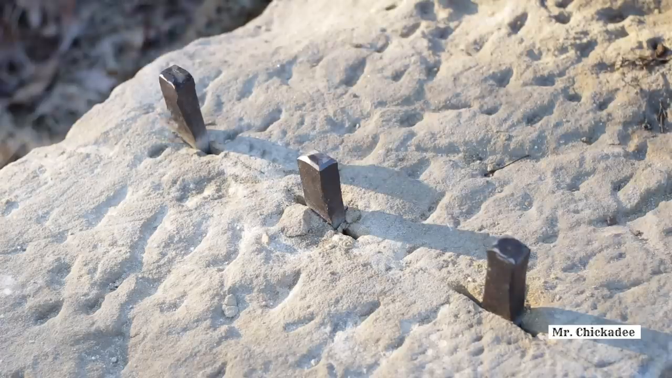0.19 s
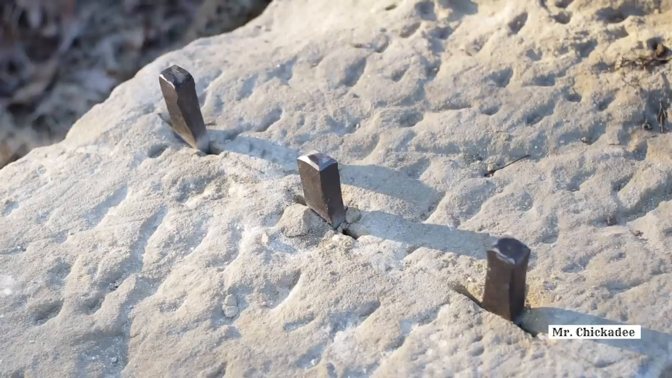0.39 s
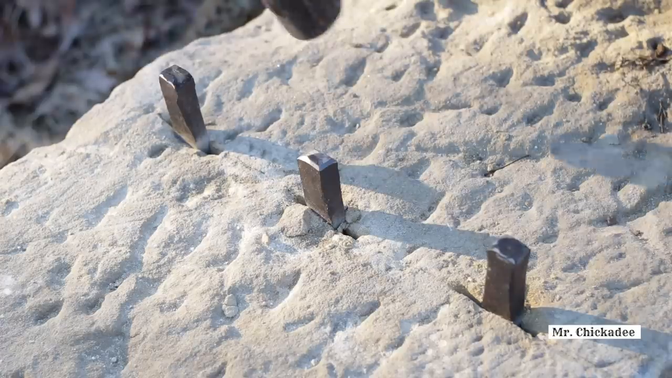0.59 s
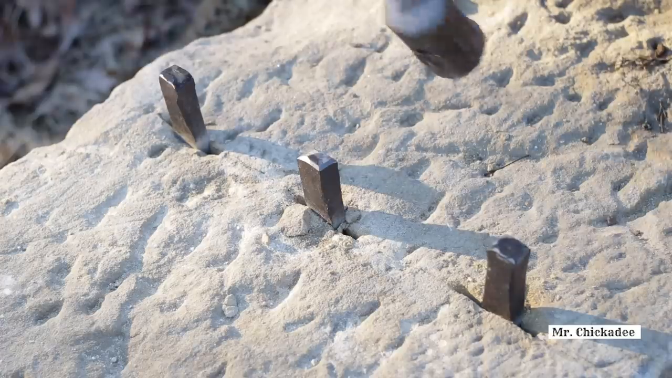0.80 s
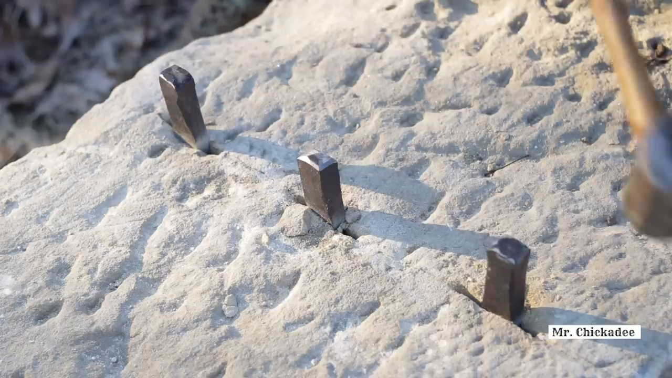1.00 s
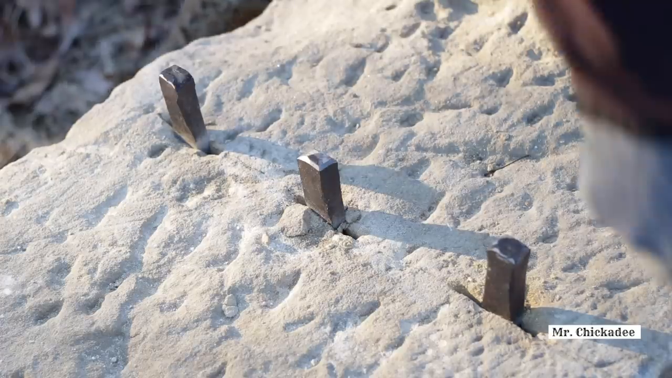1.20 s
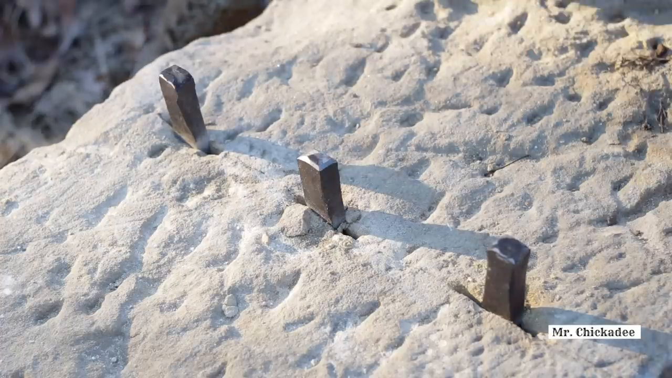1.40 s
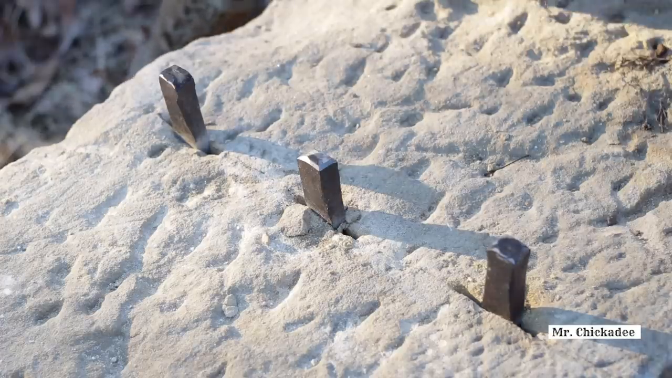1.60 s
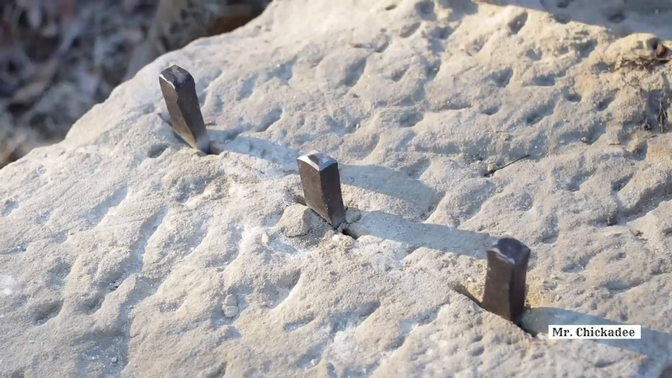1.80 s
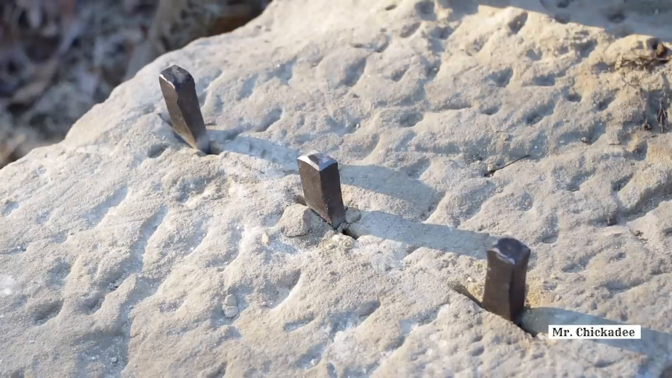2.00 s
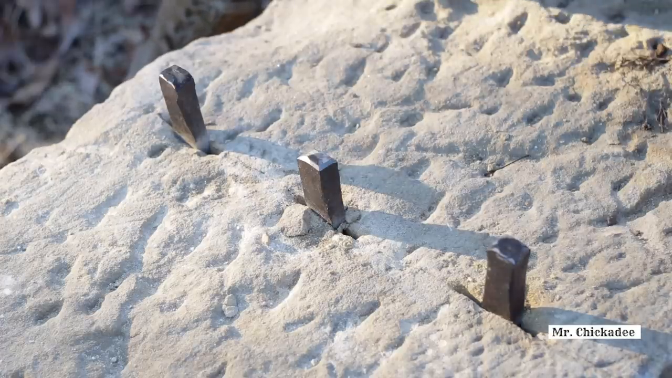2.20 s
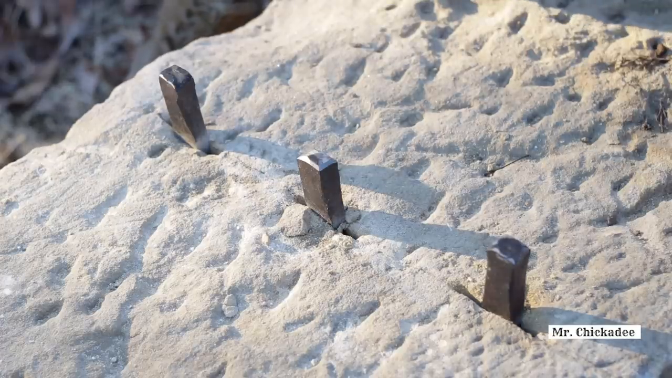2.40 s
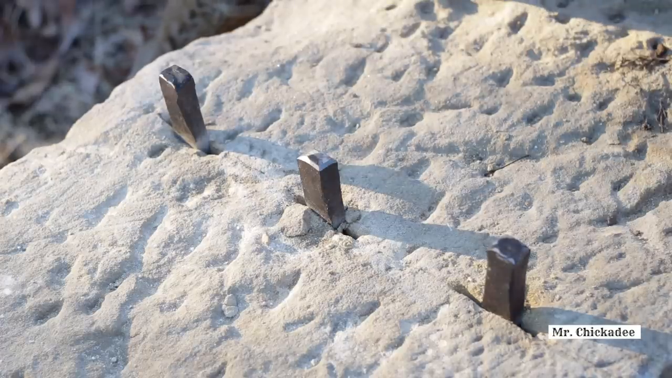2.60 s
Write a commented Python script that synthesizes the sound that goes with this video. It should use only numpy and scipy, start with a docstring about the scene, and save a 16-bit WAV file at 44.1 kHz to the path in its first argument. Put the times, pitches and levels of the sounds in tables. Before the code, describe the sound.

Hammer blows on steel wedges set in a stone block, sharp and short, with faint outdoor echo

```python
"""Hammer on steel wedges, outdoors

A hand hammer works on wedges in a stone block, close to a small stereo camera: two hard blows on two wedges and,
between them, a duller double tap. Each blow sums damped modes with noise for cracking, crumbling and the block.
Trees around return a swelling noise echo; clothes and grit rustle as grainy noise, over ticks and a bed of air.
The camera limits the hardest peaks and turns its gain down for a moment."""
import sys
import numpy as np
from scipy import signal
from scipy.fft import rfft, irfft, next_fast_len
from scipy.io import wavfile

SR = 44100
rng = np.random.default_rng(int(sys.argv[2]) if len(sys.argv) > 2 else 0)


def log_audio(samples):
    """Write samples as a 16-bit WAV file to the path given in sys.argv[1]."""
    # one column per channel
    frames = np.atleast_2d(samples).T
    # limit to full scale, then quantise
    limited = np.clip(frames, -1, 1)
    pcm = np.round(limited * 32767).astype(np.int16)
    wavfile.write(sys.argv[1], SR, pcm)


N = 114660  # samples

# Hammer blows close to the microphones; columns: t/s, level/dB, left over right/dB, left lag/ms, struck thing (0-2),
# contact/ms, crack/dB and crumble/dB (both relative to the blow), wall slap/dB, hammer ring/dB, tree echo/dB
BLOWS = [(0.2005, -8, 4.5, 0.0042, 0, 0.96, -1.5, -7.5, -39, -57, -51.5),
         (1.5362, -15, -1.5, 0.068, 1, 2.5, 1.5, -13.5, -37.5, -78, -54.5),
         (1.6525, -15, -1, 0.062, 1, 1.9, -7, -13, -37.5, -78, -59.5),
         (2.3234, -8, -2, 0.056, 2, 2.1, -1.5, -5.5, -44.5, -57, -55.5)]
# Modes of the first wedge; columns: f/Hz, level/dB, t60/s
FIRST_WEDGE_MODES = [(185, -10.5, .06), (215, -9, .06), (300, -21, 0.09), (528, -23.5, 0.053),
                     (983, -5.5, 0.02), (1211, 7.5, 0.011), (1392, 1, .015), (2188, -3.5, 0.013),
                     (3606, -8.5, 0.0082), (3960, -12.5, 0.009), (2810, -11, 0.013), (5070, -4, 0.0036),
                     (5770, -13, .006), (6310, -6.5, 0.0041), (8790, -10, 0.0029), (11050, -16.5, 0.023),
                     (15430, -41, 0.0027)]
# Modes heard in the dull double tap; columns: f/Hz, level/dB, t60/s
STONE_TAP_MODES = [(280.7, -12.5, 0.074), (535, -23.5, 0.059), (810, -14.5, 0.049), (1108, -3, 0.018),
                   (1390, 2, 0.0062), (1747, -2, .012), (1872, -7, 0.016), (2895, -4, .012),
                   (3800, -12, .01), (4436, -12.5, .01), (4950, -10, .01), (6800, -21, 0.0074),
                   (8030, -26, .008), (10900, -48.5, .005)]
# Modes of the second wedge; columns: f/Hz, level/dB, t60/s
SECOND_WEDGE_MODES = [(122, -20.5, 0.052), (265.8, -8.5, 0.051), (562, -17, 0.048), (706, -9.5, 0.032),
                      (1069, -2, 0.031), (2376, -11.5, .01), (2595, -1.5, .01), (3170, -5, .01),
                      (3470, -3.5, .01), (4950, -6, .01), (5600, 0.5, 0.0059), (6020, 4.5, 0.0059),
                      (6470, -1.5, .009), (7580, 0.5, 0.0039), (9320, -16.5, 0.01), (13800, -41, .005)]


def hammer():
    """Each blow rings, cracks and crumbles; the slab face repeats it, the hammer head rings, a wall slaps back."""
    ring_hz, ring_t60 = 12700, 0.2
    slab_delay_s, slab_db = 0.0021, -17
    wall_delay_s = 0.026
    low_cut_hz = 117
    mix, t = np.zeros((2, N)), np.arange(SR // 4) / SR
    for s, db, pan_db, lag_ms, thing, contact_ms, crack_db, crumble_db, slap_db, ring_db, _ in BLOWS:
        modes = np.array([FIRST_WEDGE_MODES, STONE_TAP_MODES, SECOND_WEDGE_MODES][round(thing)])
        late = np.clip(t - np.array([[lag_ms], [0]]) / 1000, 0, None)  # seconds since arrival, left and right
        noise = rng.standard_normal((4, len(t)))
        body = struck_modes(modes, late, contact_ms / 1000)
        body = body + breaking_stone(modes, noise, t, crack_db, crumble_db)
        body = body + stone_block(noise, t)
        pan = np.array([[pan_db], [-pan_db]]) / 2
        body = amp(db + pan) * body * (late > 0)
        ring = amp(ring_db - 60 * t / ring_t60) * np.sin(2 * np.pi * ring_hz * late)
        add(mix, s, body + ring)
        add(mix, s + slab_delay_s, amp(slab_db) * body)
        add(mix, s + wall_delay_s, amp(slap_db) * wall_slap(noise, t))
    return filtered(mix, lambda hz: (1j * hz / (1j * hz + low_cut_hz)) ** 2)


def struck_modes(modes, late, contact_s):
    """Modes build up at the strike, hold while contact lasts, then decay; the stone's grip damps the treble."""
    treble_from_hz, treble_t60 = 2000, 0.009  # longest t60 allowed above this pitch
    rise_cycles, scatter_db = 0.3, 1.5
    free = np.clip(late - contact_s, 0, None)
    body = 0
    for hz, mode_db, t60 in modes:
        if hz > treble_from_hz:
            t60 = min(t60, treble_t60)
        decay = amp(mode_db + rng.normal(0, scatter_db) - 60 * free / t60)
        rise = 1 - np.exp(-late * hz / rise_cycles)
        body = body + decay * rise * np.sin(2 * np.pi * hz * late)
    return body


def breaking_stone(modes, noise, t, crack_db, crumble_db):
    """Decaying noise coloured by the modes: a central crack and a wider, longer crumble of stone."""
    crack_t60, crumble_t60, tilt_db = 0.015, 0.03, -0.5  # tilt per octave

    def crumble_colour(hz):
        tilt = tilt_db * np.log2(hz / 1000 + 0.1)
        return amp(along(modes, hz) + tilt) * (hz > 200)

    crack = unit(filtered(noise[0], lambda hz: amp(along(modes, hz)) * (hz > 1000)))
    crumble = unit(filtered(noise[1] + 0.5 * noise[2:], crumble_colour))
    return amp(crack_db - 60 * t / crack_t60) * crack + amp(crumble_db - 60 * t / crumble_t60) * crumble


def stone_block(noise, t):
    """The block's dense low ringing, as a decaying band of noise."""
    block_db, block_hz, octaves, t60, rise_s = -18.5, 650, 0.83, 0.059, 0.0016
    block = unit(filtered(noise[3] + 0.37 * noise[:2], lambda hz: octave_band(hz, block_hz, octaves)))
    return amp(block_db - 60 * t / t60) * (1 - np.exp(-t / rise_s)) * block


def wall_slap(noise, t):
    """One dull reflection back from nearby, as a decaying band of noise."""
    wall_hz, octaves, t60, rise_s = 1450, 0.36, 0.04, 0.003
    slap = unit(filtered(noise[1:3], lambda hz: octave_band(hz, wall_hz, octaves)))
    return amp(-60 * t / t60) * (1 - np.exp(-t / rise_s)) * slap


# Small ticks and knocks; columns: t/s, level/dB, f/Hz, width/octaves, t60/s
TICKS = [(.7495, -53, 3300, 0.6, 0.026), (1.022, -46.5, 5000, 1.7, .03), (1.1064, -35, 1680, 1.17, 0.024),
         (1.1683, -47.5, 1390, 1.4, 0.087), (1.269, -56, 9200, 0.58, 0.028),
         (1.3347, -60, 5000, 1.4, 0.033), (1.378, -52.5, 9030, 0.9, 0.021), (1.454, -58.5, 2300, 0.9, 0.13),
         (1.6933, -46.5, 3200, 0.25, .015), (1.908, -50, 2000, 1.1, .012), (1.962, -45.5, 3100, .5, 0.0088),
         (1.9836, -55, 3500, .6, 0.017), (2.1015, -37, 5600, 0.63, 0.0051), (2.378, -53, 2970, .4, 0.014),
         (2.5035, -52, 2800, 0.28, .02), (2.541, -46, 5930, 1.7, .015), (2.55, -36, 5400, 0.86, 0.01),
         (2.564, -44, 8040, 0.74, .012), (2.5924, -47.5, 7900, 0.26, 0.013)]
# Soft low bump; columns: t/s, level/dB, f/Hz, t60/s
THUD = [(1.2394, -38, 310, 0.027)]


def ticks():
    """Short decaying noise bursts round a pitch, and one soft decaying sine bump."""
    mix, t = np.zeros((2, N)), np.arange(SR // 20) / SR
    for s, db, hz, octaves, t60 in TICKS:
        noise = rng.standard_normal((2, len(t)))
        burst = unit(filtered(noise[0] + 0.4 * noise, lambda f: octave_band(f, hz, octaves)))
        rise = 1 - np.exp(-t / 0.00046)
        add(mix, s, amp(db - 60 * t / t60) * burst * rise)
    for s, db, hz, t60 in THUD:
        rise = 1 - np.exp(-t * hz)
        add(mix, s, amp(db - 60 * t / t60) * np.sin(2 * np.pi * hz * t) * rise)
    return mix


# Cloth and grit as the worker moves, one list per stretch; columns: t/s, level/dB
RUSTLE = [
    [(0.9, -82.5), (0.934, -81), (0.962, -58), (1.114, -49.5), (1.134, -60), (1.176, -56), (1.224, -63.5),
     (1.52, -63)],
    [(2.0, -84), (2.036, -78), (2.046, -67), (2.094, -64.5), (2.104, -66), (2.118, -80), (2.2, -94)],
    [(2.4, -82), (2.478, -54.5), (2.534, -58), (2.55, -52), (2.58, -58), (2.6, -54.5)],
]
# A dull drag over stone; columns: t/s, level/dB
SCRAPE = [(2.37, -56), (2.42, -59.5), (2.46, -50.5), (2.53, -51.5), (2.56, -52), (2.6, -56.5)]
# Colour of the cloth and grit; columns: f/Hz, level per Hz/dB
CRISP = [(350, -44), (600, -28), (906, -11.5), (1900, -2.5), (4400, -7.5), (8160, -12.5), (10200, -14),
         (16000, -24.5)]
# Colour of the drag; columns: f/Hz, level per Hz/dB
DULL = [(300, -36), (550, -9), (900, 3), (1300, -6), (2500, -46), (5000, -46.5)]


def rustling():
    """Hiss with grains of uneven size: crisp cloth and grit, and a dull drag."""
    grains_per_s, spread_db, grain_share = 1500, 5, 0.33
    struck = rng.random((2, N)) < grains_per_s / SR
    size = amp(spread_db * np.minimum(rng.exponential(1, (2, N)), 2))
    grains = struck * size * rng.standard_normal((2, N))
    source = grain_share * unit(grains) + (1 - grain_share) * rng.standard_normal((2, N))
    crisp = spread(source, CRISP, [(1400, 0.59), (7000, 0.52)])
    # reversed in time and with channels swapped, so the drag does not follow the cloth
    dull = spread(source[::-1, ::-1], DULL, [(400, 1.0), (1400, 0.1)])
    return sum(level(rows, 0.02) for rows in RUSTLE) * crisp + level(SCRAPE, 0.022) * dull


# Decay of the echo from the trees around; columns: f/Hz, t60/s
TREES = [(150, 1.7), (1000, 1.5), (3000, 0.93), (5500, 0.69), (9000, 0.55)]
# Colour of the late echo, one list per struck thing; columns: f/Hz, level per Hz/dB
ECHOES = [
    [(59, -59), (100, -28), (194, -4.5), (390, -10), (449, -5.5), (727, -9), (1300, -4), (1940, -15),
     (2620, -11), (5280, -11.5), (12000, -36.5), (15600, -67), (22000, -120)],
    [(88, -34), (150, -7.5), (489, -9), (551, -15.5), (846, -5.5), (1990, -3), (9000, -21.5), (11700, -50),
     (19800, -120)],
    [(88, -42), (150, -5), (921, 0), (1610, -9), (1890, -15), (2480, -7.5), (6190, -10.5), (11000, -36),
     (14300, -68), (22000, -120)],
]


def trees():
    """After each blow a diffuse noise echo swells and dies, the treble first."""
    start_s, swell_s = 0.015, 0.052
    mix = np.zeros((2, N))
    for blow in BLOWS:
        s, thing, echo_db = blow[0], blow[4], blow[-1]
        alike = [(200, 0.6), (1400, 0.1), (9000, 0.05)]  # f/Hz, left-right likeness
        wash = spread(rng.standard_normal((2, SR)), ECHOES[round(thing)], alike)
        hz, t, bands = signal.stft(wash, SR, nperseg=256)
        decay = amp(-60 * t / along(TREES, hz)[:, None])
        swell = (1 - np.exp(-t / swell_s)) ** 2 * decay
        swell = swell / swell.max(1, keepdims=True)  # every band peaks at 1
        echo = signal.istft(bands * swell, SR, nperseg=256)[1]
        add(mix, s + start_s, amp(echo_db) * echo)
    return mix


# Colour of the open air; columns: f/Hz, level per Hz/dB
AIR = [(12, -51), (20, -15), (86, -7), (265, -9.5), (652, -11), (1020, -14), (1180, -12.5), (4790, -18.5),
       (7950, -20), (15200, -27), (16500, -82)]
# Left-right likeness of the air at the two microphones; columns: f/Hz, likeness (0-1)
AIR_ALIKE = [(60, 0.67), (500, 0.2), (3000, 0.1), (12000, 0.038)]


def open_air():
    """Steady coloured noise at -60 dB, wider between the channels towards the treble."""
    return amp(-60) * spread(rng.standard_normal((2, N)), AIR, AIR_ALIKE)


def amp(db):
    """Amplitude factor of a level in dB."""
    return 10 ** (np.asarray(db) / 20)


def unit(x):
    """x scaled to rms 1."""
    return x / np.sqrt(np.mean(x ** 2) + 1e-20)


def along(points, hz, axis=1):
    """A column of (f/Hz, ..) points read on a log frequency axis."""
    p = np.transpose(points)
    return np.interp(np.log(hz + 1), np.log(p[0] + 1), p[axis])


def octave_band(hz, centre_hz, octaves):
    """A bell-shaped band on a log frequency axis."""
    return np.exp(-(np.log2(hz / centre_hz + 1e-3) / octaves) ** 2)


def filtered(x, response):
    """x times a complex response of frequency."""
    m = next_fast_len(x.shape[-1] + 8192)
    return irfft(rfft(x, m) * response(np.fft.rfftfreq(m, 1 / SR)), m)[..., :x.shape[-1]]


def add(mix, s, sound):
    """Lays a sound into the mix at s seconds."""
    part = mix[..., round(s * SR):][..., :sound.shape[-1]]
    part += sound[..., :part.shape[-1]]


def spread(source, spectrum, alike):
    """Two sources as mid and side, shared out by left-right likeness, coloured, rms 1."""
    def colour(hz):
        turn = np.arccos(np.clip(along(alike, hz), -1, 1)) / 2
        return amp(along(spectrum, hz)) * [np.cos(turn), np.sin(turn)]

    mid, side = filtered(source, colour)
    return unit(np.array([mid + side, mid - side]))


def level(rows, fade_s):
    """Gain along (t/s, level/dB) rows, fading in before and out after them."""
    t, (s, db) = np.arange(N) / SR, np.transpose(rows)
    outside_s = np.clip(s[0] - t, 0, None) + np.clip(t - s[-1], 0, None)
    return amp(np.interp(t, s, db)) * np.exp(-outside_s / fade_s)


def scene():
    """The blows at full bandwidth over the faint sounds, which stop at 15900 Hz."""
    faint = trees() + rustling() + ticks() + open_air()
    return hammer() + filtered(faint, lambda hz: hz < 15900)


def record(dry):
    """The camera's gain ducks at loud peaks and recovers steadily; then soft clipping and a band limit."""
    agc_from_db, agc_share, agc_attack_s, agc_db_per_s = -7.5, 0.52, 0.0011, 153
    clip_top, clip_hardness, top_hz = 0.56, 7, 16950
    t = np.arange(N) / SR
    peak_db = 20 * np.log10(np.abs(dry).max(0) + 1e-9)
    over_db = agc_share * np.clip(peak_db - agc_from_db, 0, None)
    recovery_db = agc_db_per_s * t
    duck_db = np.maximum.accumulate(over_db + recovery_db) - recovery_db
    keep = np.exp(-1 / (agc_attack_s * SR))
    x = dry * amp(-signal.lfilter([1 - keep], [1, -keep], duck_db))
    x = x / (1 + np.abs(x / clip_top) ** clip_hardness) ** (1 / clip_hardness)
    return filtered(x, lambda hz: np.clip((top_hz - hz) / 600, 0, 1) ** 2)


dry = scene()
out = record(dry)
log_audio(out)
```